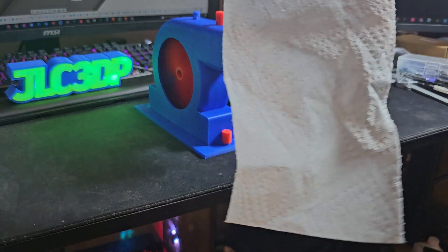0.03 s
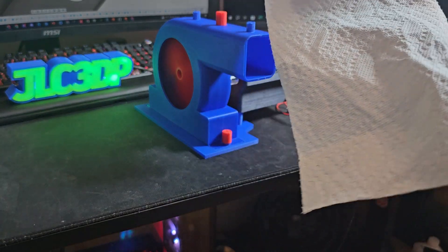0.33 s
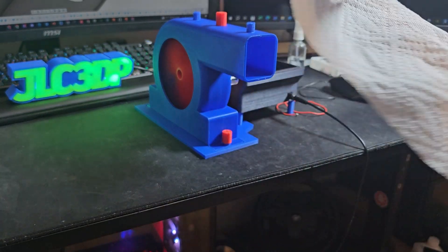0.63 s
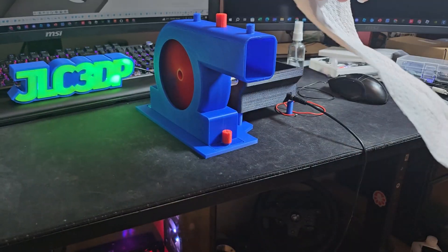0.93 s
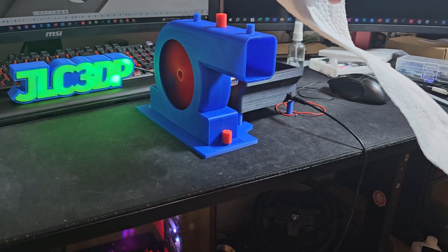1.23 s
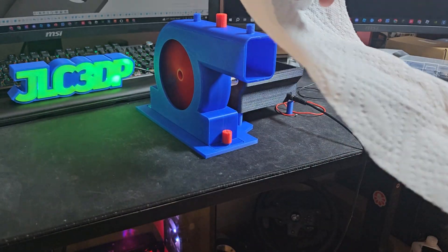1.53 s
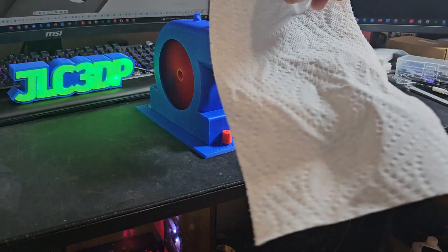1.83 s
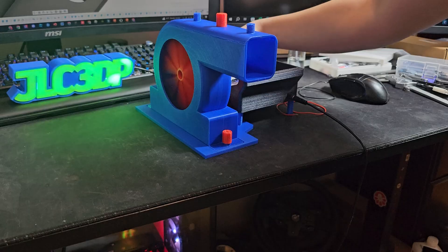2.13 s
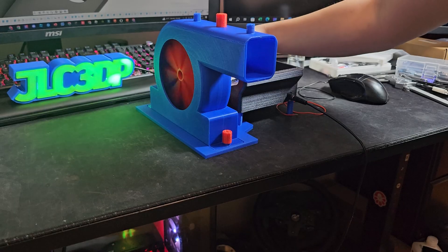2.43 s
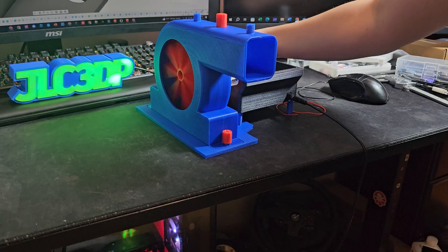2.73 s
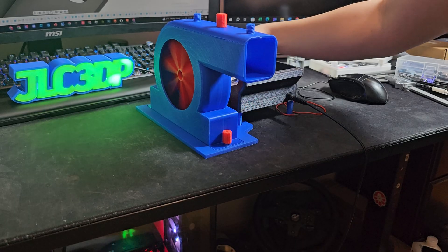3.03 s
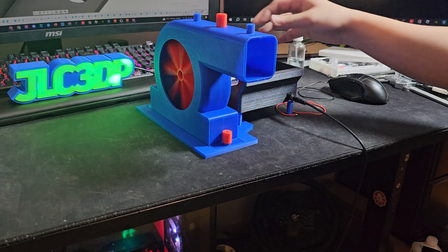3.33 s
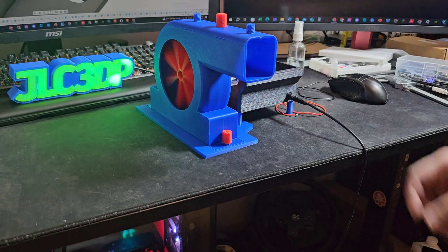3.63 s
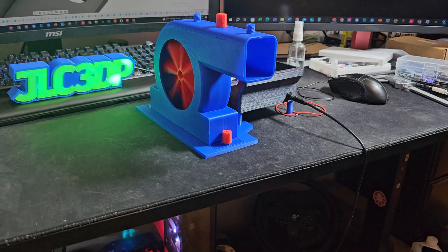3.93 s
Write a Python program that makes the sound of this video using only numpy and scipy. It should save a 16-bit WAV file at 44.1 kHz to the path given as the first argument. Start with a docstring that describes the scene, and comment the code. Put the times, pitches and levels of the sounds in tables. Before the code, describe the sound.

A small blower rattles loudly with pulsing air, almost straight ahead in a small room. Halfway through it switches off, and its loose fan wheel slows with quieter rattling, knocks, plastic ticks and a single snap over a low hum.

```python
"""A rattling blower is cut off

A small plastic blower runs on a desk. Its loose impeller (the fan wheel) chatters against the housing
under a surging hiss of air. The power is cut and the impeller coasts, knocking and ticking ever more
thinly over a low desk hum. A hand at the wiring makes one sharp snap, and a small room answers."""
import sys
import numpy as np
from scipy import signal
from scipy.fft import rfft, irfft, next_fast_len
from scipy.io import wavfile
from scipy.ndimage import uniform_filter1d, map_coordinates

SR = 44100
rng = np.random.default_rng(int(sys.argv[2]) if len(sys.argv) > 2 else 0)


def write(x):
    x = np.atleast_2d(x).T
    wavfile.write(sys.argv[1], SR, np.round(np.clip(x, -1, 1) * 32767).astype(np.int16))


N = 176400
TIME = np.arange(N) / SR
FFT_SIZE = next_fast_len(N + SR // 2, True)
FREQS = np.fft.rfftfreq(FFT_SIZE, 1 / SR)

POWER_OFF_S, POWER_FADE_S = 2.031, 0.0013
SHAFT_HZ, HALF_SPEED_S = 193.25, 1.03  # turns a second under power; time for drag to halve them

# Levels in the tables are relative: the functions set the final loudness.
# The surging under power: time_s, chatter_db, hiss_db
RUNNING_LEVELS = [(0.0, -10, -20), (0.02, -11.5, -27.5), (0.08, -14, -22), (0.11, -15, -25),
                  (0.13, -11.5, -26.5), (0.16, -16, -24.5), (0.26, -12.5, -25.5), (0.34, -17, -33.5),
                  (0.36, -11, -21.5), (0.45, -14.5, -26.5), (0.47, -13, -25.5), (0.49, -14.5, -24),
                  (0.56, -13.5, -27.5), (0.56, -14.5, -24), (0.68, -14, -23.5), (0.73, -16, -28.5),
                  (0.76, -12.5, -27), (0.79, -21.5, -34.5), (0.82, -17, -34), (0.83, -15.5, -26),
                  (0.84, -15, -24.5), (0.94, -11.5, -24), (0.96, -15.5, -28.5), (0.98, -17.5, -30),
                  (1.0, -11.5, -27), (1.01, -16, -24.5), (1.1, -12, -24), (1.16, -15.5, -25),
                  (1.17, -12.5, -24), (1.21, -19, -29.5), (1.24, -12.5, -29), (1.29, -16, -25.5),
                  (1.33, -11.5, -26), (1.35, -16, -23), (1.37, -11, -27), (1.42, -20.5, -31),
                  (1.43, -12.5, -31), (1.46, -17.5, -34.5), (1.5, -11.5, -24.5), (1.51, -15, -25),
                  (1.54, -12, -22.5), (1.6, -16, -26.5), (1.63, -11, -26), (1.64, -18, -28),
                  (1.71, -16.5, -32), (1.73, -12, -25), (1.77, -15.5, -24.5), (1.79, -12, -23.5),
                  (1.83, -20, -33), (1.85, -14, -24.5), (1.88, -14, -26), (2.02, -15, -26.5)]
# The fading after the cut: time_s, rattle_db, hiss_db, fizz_db
COASTING_LEVELS = [(2.05, -32, -41.5, -50), (2.2, -30.5, -42, -54), (2.31, -30, -43.5, -56),
                   (2.4, -31, -44, -53), (2.5, -29, -42, -60), (2.56, -32, -47, -55),
                   (2.6, -33.5, -45, -57), (2.665, -34, -50, -57), (2.7, -30.5, -45.5, -53),
                   (2.92, -30, -45, -60), (3.08, -30, -47, -56), (3.115, -36, -49, -61),
                   (3.17, -29.5, -45, -55), (3.34, -31, -48, -56), (3.43, -32.5, -49, -59),
                   (3.58, -33, -47.5, -65), (3.69, -33.5, -50.5, -73), (3.83, -32.5, -49, -70),
                   (3.94, -32, -52, -73), (4, -38.5, -58, -79)]
# Hard knocks of the impeller: start_s, level_db
KNOCK_HITS = [(2.049, -10.5), (2.103, -14.5), (2.128, -24), (2.144, -26), (2.221, -13.5), (2.257, -12.5),
              (2.326, -19), (2.376, -12), (2.463, -15.5), (2.491, -10.5), (2.542, -16), (2.555, -16.5),
              (2.606, -15.5), (2.617, -21), (2.638, -19), (2.69, -13.5), (2.709, -19), (2.725, -12),
              (2.775, -16), (2.841, -13.5), (2.905, -11.5), (2.994, -18), (3.064, -13.5), (3.127, -13.5),
              (3.193, -13), (3.242, -13.5), (3.309, -18.5), (3.454, -19), (3.595, -22), (3.733, -21.5),
              (3.803, -20), (3.925, -24)]
# Bright ticks of plastic: start_s, level_db
TICK_HITS = [(2.0624, -24), (2.116, -22), (2.2556, -18.5), (2.37, -23), (2.4943, -27.5), (2.6718, -30),
             (2.9066, -36), (3.125, -36), (3.2425, -25.5), (3.3847, -34), (3.5369, -30), (3.7324, -36),
             (3.8005, -33), (3.882, -34), (3.924, -30)]
# Pitches at which the housing rings: pitch_hz, width_hz, running_boost_db, coasting_boost_db
HOUSING_RINGS = [(242, 25, 18, 6), (447.5, 41, 9, 7), (524, 41, -1, 5.5), (613.4, 22, 7.5, 4),
                 (664, 34, 9.5, 3.5), (734.5, 51, 7, 10.5), (865.7, 13.7, 14, 9.5), (898.8, 38, -1.5, 14.5),
                 (1007, 34, 0.5, -2.5), (1082.5, 92, 3.5, 12), (1172, 25, 4, 0.5), (1276, 61, 7.5, 4),
                 (1492, 47, 1, 10.5), (1560, 44, 0.5, 1), (1744, 61, 11, 2.5), (1857, 64, 7, 6.5),
                 (2006, 62, 7, 1.5), (2580, 40, 3.5, -1), (3040, 97, 4, -1), (3720, 34, 4, 1),
                 (4590, 38, 9, 4.5)]
# How well the desk passes the shaft's hum: pitch_hz, gain_db
DESK_RESPONSE = [(60, -53), (85, -45.5), (105, -49), (120, -52), (137, -41.5), (152, -71), (178, -73),
                 (194, -47.5)]
# How wide the sound is, from bass to treble: pitch_hz, side_over_mid_db
STEREO_WIDTH = [(60, -17), (99, -24), (160, -19), (270, -12), (450, -7), (740, -4), (1220, -2),
                (2010, -2.5), (3330, 2.5), (5500, 0), (9080, -1), (15000, -0.5)]

# The tone of each sound, from bass to treble: pitch_hz, gain_db
CHATTER_TONE = [(60, -20), (170, -27), (260, -27), (360, -25), (560, -9.5), (790, -11), (1050, -1),
                (1900, -1), (2250, -11.5), (3200, -14), (6000, -25.5), (15000, -47)]
AIR_TONE = [(800, -37), (2200, 3.5), (3200, 3), (4700, 0), (5600, -2.5), (6800, -7.5), (7600, -7),
            (9500, -8.5), (12000, -7.5), (13800, -13), (15800, -11)]
RATTLE_TONE = [(60, -39), (230, -15), (390, -19.5), (520, -3.5), (820, -5), (970, -5.5), (1200, -2.5),
               (1900, -0.5), (2250, -4), (2750, -8.5), (3500, -18.5), (6000, -27.5), (11000, -45),
               (15000, -69)]
RATTLE_PING_TONE = [(1800, -32), (2400, -8), (2600, 7.5), (2800, -2), (3200, -10), (5000, -47),
                    (10000, -70)]
FADING_AIR_TONE = [(800, -13), (3000, 3.5), (4700, 1.5), (6500, -5.5), (7700, -1.5), (9200, -9.5),
                   (11500, -9.5), (13000, -25), (15800, -36)]
HIGH_FIZZ_TONE = [(6000, -25), (9000, 3), (11500, 3), (13200, -1), (15800, -5)]
WHIRR_TONE = [(300, -38), (600, -30), (950, -30), (1150, 2.5), (1750, 5.5), (2300, -14), (6000, -26),
              (15000, -45)]
HARD_KNOCK_TONE = [(100, -33), (380, -27.5), (520, -7.5), (900, -7.5), (1200, -1.5), (1850, 1),
                   (2200, -6.5), (2700, -3.5), (3400, -15), (6000, -24), (15000, -48)]
PLASTIC_TICK_TONE = [(500, 5), (2500, 11), (4500, -3), (7500, -1.5), (10500, -10), (15000, -14)]
WIRING_SNAP_TONE = [(500, -20), (2500, -8), (4500, 6), (7000, 2), (11000, -2), (15500, -3)]
MOTOR_TONE = [(100, -30), (170, -15), (200, -17), (232, 2.5), (255, -1.5), (280, -13), (380, -19),
              (500, -22), (900, -39), (3000, -67)]
RUMBLE_TONE = [(20, -39), (32, -13), (42, -18), (53, -7), (70, -1.5), (95, 1), (140, -0.5), (160, -18.5),
               (200, -16), (235, -7.5), (300, -19.5), (345, -18.5), (420, -39.5), (1500, -80)]


def running_blower():
    """The driven impeller hits the housing so fast that it chatters; the air hiss pulses with it."""
    chatter_db, hiss_db = level_curves(RUNNING_LEVELS)
    blows = contacts(slip_turns=0.14, uneven_db=1.5, heavy_side_db=3.1)
    strikes = unit(bursts(blows, ring_s=0.0057, room_s=0.31, room_db=-5))
    strikes[0] += amp(-6) * unit(blows)  # bare clicks in the centre of the sound
    chatter = steady(shape_tone(strikes, CHATTER_TONE, housing_boost(driven=True)))
    puffs = vary_tone(bursts(blows, ring_s=0.025, room_s=0.28, room_db=-7.5), spread_db=1.5)
    hiss = unit(shape_tone(puffs, AIR_TONE, housing_boost(driven=True)))
    chatter *= amp(chatter_db + 2 + 0.45 * wobble(59.97))
    hiss *= amp(hiss_db + 3 + 1.3 * wobble(50.47))
    return power() * (chatter + hiss)


def coasting_impeller():
    """The slowing impeller rattles and pings against the housing over a fading hiss."""
    rattle_db, hiss_db, fizz_db = level_curves(COASTING_LEVELS)
    blows = contacts(slip_turns=0.078, uneven_db=5.5, heavy_side_db=2)
    strikes = vary_tone(bursts(blows, ring_s=0.021, room_s=0.19, room_db=-8), spread_db=1.5)
    rattle = steady(shape_tone(strikes, RATTLE_TONE, housing_boost(driven=False))) * amp(rattle_db + 1.8)
    ping_blows = contacts(slip_turns=0.058, uneven_db=10.5, heavy_side_db=-3)
    ping_strikes = bursts(ping_blows, ring_s=0.014, room_s=0.1, room_db=-31)
    pings = steady(shape_tone(ping_strikes, RATTLE_PING_TONE)) * amp(rattle_db - 11)
    hiss_puffs = bursts(blows, ring_s=0.014, room_s=0.2, room_db=-4)
    hiss = unit(shape_tone(hiss_puffs, FADING_AIR_TONE)) * amp(hiss_db + 2.5)
    fizz_puffs = bursts(blows, ring_s=0.014, room_s=0.15, room_db=-4)
    fizz = unit(shape_tone(fizz_puffs, HIGH_FIZZ_TONE)) * amp(fizz_db)
    return (1 - power()) * (rattle + pings + hiss + fizz)


def last_whirr(end_s=2.3, fade_s=0.09):
    """Just after the cut the impeller is still fast and rings the housing's higher pitches."""
    blows = contacts(slip_turns=0.045, uneven_db=3.5, heavy_side_db=1)
    strikes = vary_tone(bursts(blows, ring_s=0.0069, room_s=0.15, room_db=-34), spread_db=5)
    whirr = steady(shape_tone(strikes, WHIRR_TONE, housing_boost(driven=False)))
    fade_out = np.clip((end_s - TIME) / fade_s, 0, 1)
    return whirr * (1 - power()) * fade_out * amp(-24.5)


def knocks(bounce_s=0.006):
    """Now and then the coasting impeller hits the housing hard and bounces once."""
    start_s, level_db = np.transpose(KNOCK_HITS)
    blows = impulses(start_s, amp(level_db - 5)) + impulses(start_s + bounce_s, amp(level_db - 11))
    strikes = vary_tone(bursts(blows, ring_s=0.035, room_s=0.31, room_db=-16.5), spread_db=2)
    return shape_tone(strikes, HARD_KNOCK_TONE, housing_boost(driven=False))


def plastic_ticks():
    """Light taps of plastic, each a hard edge followed by the room's echo."""
    start_s, level_db = np.transpose(TICK_HITS)
    taps = impulses(start_s, amp(level_db - 3))
    ticks = bursts(taps, ring_s=0.04, room_s=0.33, room_db=-6) + amp(-5) * hard_edge(taps)
    return shape_tone(vary_tone(ticks, spread_db=-1.5), PLASTIC_TICK_TONE)


def wiring_snap(start_s=2.765):
    """A hand at the wiring makes one sharp snap that echoes briefly."""
    crack = impulses([start_s], amp([-19.5]))
    snap = bursts(crack, ring_s=0.02, room_s=0.21, room_db=-3.5) + amp(-1) * hard_edge(crack)
    return shape_tone(snap, WIRING_SNAP_TONE)


def motor_drone():
    """While it has power, the motor drones evenly through the base."""
    return power() * amp(-40) * unit(shape_tone(noise(), MOTOR_TONE))


def desk_hum():
    """The unbalanced impeller shakes the desk once a turn, humming over a low rumble."""
    on, turns = power(), shaft_turns()
    speed_hz = np.gradient(turns) * SR
    desk_db = np.interp(speed_hz, *np.transpose(DESK_RESPONSE))
    hum = np.sqrt(2) * np.sin(2 * np.pi * turns + 0.16 * wobble(15)) * amp(desk_db + 1.9 * wobble(7))
    rumble = unit(shape_tone(noise(), RUMBLE_TONE))
    return hum + rumble * (on * amp(-46.5) + (1 - on) * amp(-40))


def power():
    """1 while the motor drives, dropping quickly to 0 at the cut."""
    return np.exp(-np.maximum(TIME - POWER_OFF_S, 0) / POWER_FADE_S)


def shaft_turns():
    """Count the shaft's turns: steady at first, then slowed by air drag."""
    speed_hz = SHAFT_HZ / (1 + np.maximum(TIME - POWER_OFF_S, 0) / HALF_SPEED_S)
    return np.cumsum(speed_hz) / SR


def contacts(slip_turns, uneven_db, heavy_side_db, per_turn=3):
    """The impeller touches a few times a turn, loosely timed; its heavy side sways the strength."""
    turns = shaft_turns()
    due_turns = np.arange(0, turns[-1], 1 / per_turn)
    timing, strength = rng.standard_normal((len(due_turns), 2)).T
    size_db = uneven_db * np.minimum(strength, 1.7) + heavy_side_db * np.cos(2 * np.pi * due_turns)
    start_s = np.interp(due_turns + slip_turns * timing, turns, TIME)
    return impulses(start_s, amp(size_db))


def housing_boost(driven):
    """The decibels that the housing adds around the pitches where it rings."""
    return sum((on_db if driven else off_db) / (1 + (2 * (FREQS - pitch_hz) / width_hz) ** 2)
               for pitch_hz, width_hz, on_db, off_db in HOUSING_RINGS)


def impulses(start_s, sizes):
    """One spike for each blow."""
    samples = np.clip(np.round(np.asarray(start_s) * SR).astype(int), 0, N)
    return np.bincount(samples, sizes, N + 1)[:N]


def bursts(blows, ring_s, room_s, room_db):
    """Each blow becomes a noise burst and a room echo, falling 60 dB in ring_s and room_s."""
    t = TIME[:SR // 2]
    decay = amp(-60 * t / ring_s) ** 2 + amp(room_db - 60 * t / room_s) ** 2
    energy = signal.fftconvolve(blows ** 2, decay)[:N]
    return noise() * np.sqrt(np.abs(energy))


def hard_edge(blows):
    """The very short burst that starts a click."""
    return bursts(blows, ring_s=0.0071, room_s=0.05, room_db=-30)


def vary_tone(pair, spread_db):
    """Every contact lands somewhere else and so favours other pitches."""
    spectra = signal.stft(pair, nperseg=512)[2]
    patches = rng.standard_normal(spectra.shape[1:])
    for axis in (0, 1):  # smooth over pitch, then time
        patches = uniform_filter1d(patches, size=6, axis=axis)
    return signal.istft(spectra * unit(amp(spread_db * unit(patches))), nperseg=512)[1][:, :N]


def shape_tone(pair, tone, boost_db=0):
    """Give a mid (centre) and side pair its tone, then spread it to left and right."""
    gain = unit(amp(tone_curve(tone) + boost_db))
    # Folding the cepstrum makes a filter that rings only after a blow, never before.
    cepstrum = irfft(np.log(np.maximum(gain, 1e-6)), FFT_SIZE)
    cepstrum[1:FFT_SIZE // 2] *= 2
    cepstrum[FFT_SIZE // 2 + 1:] = 0
    spectrum = rfft(pair, FFT_SIZE) * np.exp(rfft(cepstrum))
    width = np.arctan(amp(tone_curve(STEREO_WIDTH)))
    mid, side = irfft(spectrum * [np.cos(width), np.sin(width)], FFT_SIZE)[:, :N]
    return np.array([mid + side, mid - side])


def tone_curve(points):
    """Join a table's points along a log pitch scale."""
    pitch_hz, gain_db = np.transpose(points)
    return np.interp(np.log(FREQS + 1), np.log(pitch_hz + 1), gain_db)


def level_curves(rows):
    """Stretch each level column to one value per sample."""
    time_s, *columns = np.transpose(rows)
    return [np.interp(TIME, time_s, column) for column in columns]


def wobble(rate_hz):
    """A smooth curve through rate_hz random points a second."""
    points = rng.standard_normal(int(N * rate_hz / SR) + 4)
    return map_coordinates(points, [TIME * rate_hz], mode="nearest")


def noise():
    """Two unrelated white noises."""
    return rng.standard_normal((2, N))


def steady(x):
    """Hold the average level (rms) near 1 over every fifth of a second."""
    energy = uniform_filter1d(np.mean(x ** 2, axis=0), size=SR // 5)
    return x / np.sqrt(np.abs(energy) + 1e-12)


def unit(x):
    """Scale to an average level (rms) of 1."""
    return x / np.sqrt(np.mean(x ** 2) + 1e-20)


def amp(db):
    """Turn decibels into a gain."""
    return 10 ** (np.asarray(db) / 20)


def scene():
    """The blower stands almost straight ahead; the coasting and the hum lean slightly left."""
    powered = running_blower() + motor_drone()
    after_cut = last_whirr() + coasting_impeller() + knocks() + plastic_ticks() + wiring_snap()
    return powered + after_cut * amp([[0.3], [-0.3]]) + desk_hum() * amp([[0.4], [-0.4]])


def record(dry, right_lag_s=0.00004, low_cut_hz=40, top_hz=16000):
    """Two spaced microphones: peaks are rounded off, the deepest bass and highest treble are cut."""
    rounded = dry / (1 + np.abs(dry) ** 8) ** (1 / 8)
    spacing = np.exp(-2j * np.pi * FREQS * np.array([[0], [right_lag_s]]))
    low_cut = FREQS ** 2 / np.hypot(FREQS ** 2, low_cut_hz ** 2)
    return irfft(rfft(rounded, FFT_SIZE) * spacing * low_cut * (FREQS < top_hz), FFT_SIZE)[:, :N]


dry = scene()
out = record(dry)
write(out)
```